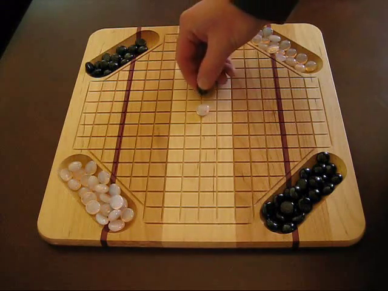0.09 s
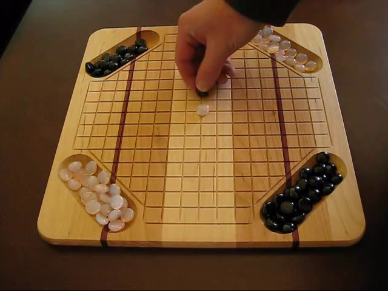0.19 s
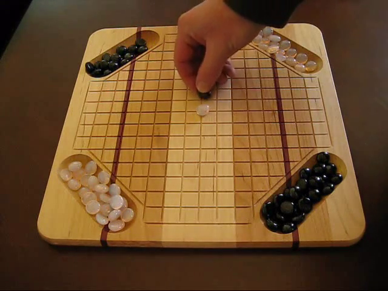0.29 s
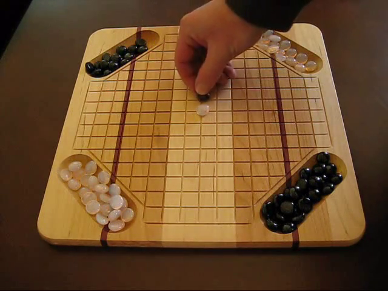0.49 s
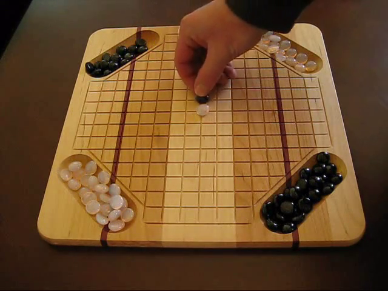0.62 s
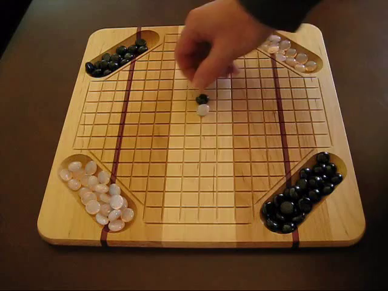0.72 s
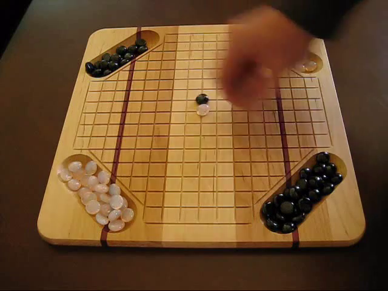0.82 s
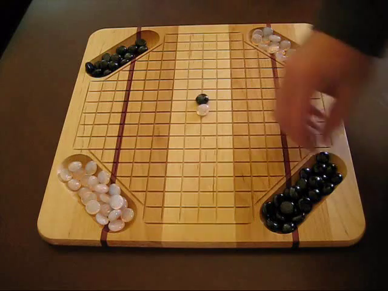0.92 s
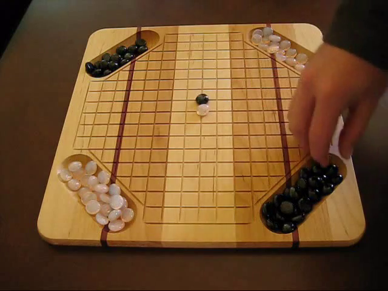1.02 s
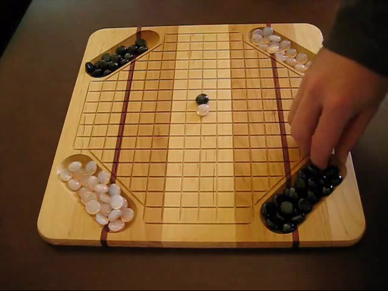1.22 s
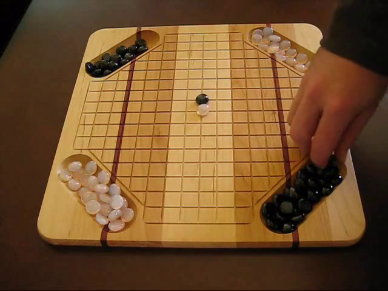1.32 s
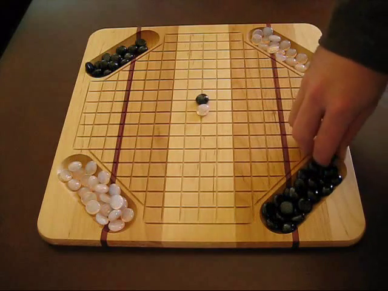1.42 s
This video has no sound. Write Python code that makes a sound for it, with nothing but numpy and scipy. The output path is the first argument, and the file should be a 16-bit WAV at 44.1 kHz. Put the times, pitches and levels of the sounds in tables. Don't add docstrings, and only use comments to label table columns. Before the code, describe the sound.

Glass gem taps and clacks down on a wooden board, then fingers rattle a tray of gems

```python
import sys
import numpy as np
from scipy import signal
from scipy.fft import rfft, irfft, next_fast_len
from scipy.io import wavfile
from scipy.ndimage import uniform_filter1d

SR = 44100
rng = np.random.default_rng(int(sys.argv[2]) if len(sys.argv) > 2 else 0)


def ratio_of_db(decibels):
    return 10 ** (np.asarray(decibels, float) / 20)


def pcm_store(signal):
    levels = np.round(np.clip(np.atleast_2d(signal), -1, 1) * 32767)
    wavfile.write(sys.argv[1], SR, levels.astype(np.int16).T)


N = 63945


def along(points, hz):
    f, value = np.transpose(points)
    return np.interp(np.log(hz + 1), np.log(f + 1), value)


def filtered(x, response):
    m = next_fast_len(N + 8192)
    return irfft(rfft(x, m) * response(np.fft.rfftfreq(m, 1 / SR)), m)[:N]


def resonance(f, hz, wide_hz):
    return 1j * f * wide_hz / (hz * hz - f * f + 1j * f * wide_hz)


# f/Hz, density level/dB per Hz
HISS = [(15, -53), (25, -14), (80, -10.5), (103, -3.5), (128, -9), (290, -9), (944, -11), (7000, -23),
        (9100, -28.5), (15400, -120)]
# f/Hz, density level/dB per Hz
HISS_TOP = [(7000, -16), (8400, -26), (10500, -25), (15300, -28)]


def hiss():
    def colour(hz):
        return ratio_of_db(along(HISS[:-1] + HISS_TOP, hz)) * (hz < 15450) * (hz > 15)

    noise = filtered(rng.standard_normal(N), colour)
    return ratio_of_db(-52) * noise / noise.std()


# f/Hz, t60/s
ROOM = [(300, 0.18), (1500, .3), (4000, 0.26), (7000, 0.16), (12000, 0.16)]


def room(x, splits):
    delay_s, even_hz = 0.0022, 150
    out, now = np.zeros(N), np.arange(N)
    for start, end in zip(splits, splits[1:]):
        hz, t, z = signal.stft(rng.standard_normal(SR // 2), SR, nperseg=128)
        decay = ratio_of_db(-60 * t / along(ROOM, hz)[:, None])
        tail = signal.istft(z * decay, SR, nperseg=128)[1]
        spectrum = rfft(tail)
        power = np.abs(spectrum) ** 2
        bins = round(even_hz * len(tail) / SR)
        even = np.sqrt(uniform_filter1d(power, 12 * bins)) / np.sqrt(uniform_filter1d(power, bins))
        tail = irfft(spectrum * even, len(tail))[:-SR // 20]
        tail = np.pad(tail / np.linalg.norm(tail), (round(delay_s * SR), 0))
        part = np.where((now >= start * SR) & (now < end * SR), x, 0)
        out += signal.fftconvolve(part, tail)[:N]
    return out


# t/s, level/dB, f/Hz, t60/s
THUDS = [
    (.399, -36.5, 554, 0.11),
    (.394, -43, 389, 0.058),
    (1.118, -41, 191.4, 0.13),
    (1.143, -47, 192, 0.17),
]


def thuds():
    s, db, hz, t60 = np.transpose(THUDS)[:, :, None]
    t = np.clip(np.arange(N) / SR - s, 0, None)
    swell = 1 - np.exp(-t / 0.0034)
    return (ratio_of_db(db - 60 * t / t60) * swell * np.sin(2 * np.pi * hz * t)).sum(0)


def struck(hits, modes_of, rise_s, crack_db=7):
    out, t = np.zeros((2, N + SR)), np.arange(SR // 6) / SR
    damped = ratio_of_db(-8 * np.clip(t / .0024 - 1, 0, .4) / .4)
    for row in hits:
        hz, db, t60 = np.transpose(modes_of(row))[:, :, None]
        sign = (-1.) ** np.arange(len(hz))[:, None]
        scattered = ratio_of_db(db + 1.5 * rng.standard_normal(db.shape))
        tones = sign * scattered * np.sin(2 * np.pi * hz * t)
        ring = (tones * ratio_of_db(-60 * t / t60)).sum(0) * damped * (1 - np.exp(-(t / rise_s) ** 2))
        brief_t60 = np.minimum(t60 / 3, .0035 * (1 + (1500 / hz) ** 2))
        blow = (tones * ratio_of_db(-60 * t / brief_t60)).sum(0) * (1 - np.exp(-t / .0001))
        crack = t == 0
        blow = blow / np.linalg.norm(blow) + ratio_of_db(crack_db) * crack
        blow = blow * np.linalg.norm(ring) / np.linalg.norm(blow)
        pair = np.array([ring, blow])
        out[:, round(row[0] * SR):][:, :len(t)] += ratio_of_db(row[1]) * pair / np.abs(ring).max()
    return out[:, :N]


def tilted(modes):
    return lambda row: [(hz, db + row[2] * np.log2(hz / 2600), t60) for hz, db, t60 in modes]


# t/s, level/dB, brightness/dB per octave
RELEASE = [
    (.7462, -40, -2),
    (.7492, -38, -3),
    (.753, -47, 1),
    (.762, -45, -6),
    (.772, -55, -16),
    (.7835, -42, -18),
]
# f/Hz, level/dB, t60/s
RELEASE_MODES = [(967, -7, .05), (1630, 0, 0.041), (2250, -1, .03), (3200, 1.5, 0.028)]


def release():
    return struck(RELEASE, tilted(RELEASE_MODES), rise_s=.0006)


# t/s, length/s, tray level/dB, glass fizz level/dB, broad scrape level/dB
SHUFFLES = [
    (1.112, 0.061, -33, -35, -23),
    (1.317, 0.12, -44, -47, -44),
    (1.399, 0.016, -35, -62, -53),
    (1.417, 0.02, -30, -71, -51),
    (1.436, 0.024, -41, -66, -57),
]
# f/Hz, level/dB
RUB = [(1700, 2), (2000, 9.5), (2200, 6.5), (3180, 3.5), (6300, -11)]


def shuffle():
    t, draw = np.arange(N) / SR, rng.random((2, N))
    grains = (draw[0] < 4000 / SR) * (draw[1] * 2 - 1)
    push = np.zeros((3, N))
    for start, length, *dbs in SHUFFLES:
        swell = np.sin(np.pi * np.clip((t - start) / length, 0, 1)) ** .5
        push += ratio_of_db(np.array(dbs)[:, None]) * swell

    def body(f):
        return sum((-1) ** k * ratio_of_db(db + 10) * resonance(f, hz, 330) for k, (hz, db) in enumerate(RUB))

    notes = filtered(push[0] * grains, body)
    fizz = filtered(push[1] * grains, lambda f: resonance(f, 11500, 9000) ** 2)
    scrape = filtered(push[2] * grains, lambda f: resonance(f, 2600, 4500))
    return notes + fizz + scrape


# t/s, level/dB, brightness/dB per octave
KNOCKS = [(1.1115, -36, 0), (1.1177, -34, 11), (1.1238, -23, 1), (1.1246, -12, 1.5), (1.1272, -35, 15),
          (1.1292, -27, 3), (1.134, -25, -3), (1.14, -28, -4), (1.1436, -21, -1), (1.1448, -16, -2),
          (1.149, -28, -17), (1.156, -35, 5), (1.159, -30, -7), (1.1616, -22.5, -4), (1.1663, -21, 0),
          (1.1707, -29, -6), (1.174, -32, -31), (1.18, -52, -2), (1.186, -43, -6), (1.1908, -32, 4),
          (1.3348, -41, -1), (1.3515, -41, 16), (1.3609, -35.5, 4), (1.3897, -34, 8), (1.4035, -44, -6),
          (1.4062, -34.5, -3), (1.4138, -31.5, -2), (1.4225, -39, 3), (1.4255, -34, -3), (1.429, -37, 2),
          (1.4335, -31.5, -1)]
# f/Hz, level/dB, t60/s
TRAY_MODES = [(1160, -12, 0.018), (1560, -4, 0.0088), (1987, 2, 0.014), (2210, -0.5, 0.031),
              (2740, -3.5, 0.013), (3204, 4, 0.024), (3870, -9.5, 0.015), (4366, -3.5, 0.015),
              (5500, -10, 0.011)]


def knocks():
    return struck(KNOCKS, tilted(TRAY_MODES), rise_s=.0006)


# t/s, peak level/dB, main ring f/Hz, upper ring level/dB, lower ring level/dB
PLUNGE = [(1.1121, -39, 8800, -3, 12), (1.1173, -25, 9100, -16, -12), (1.1237, -24, 10300, -3, -4),
          (1.1246, -12, 10100, -3, -6), (1.1258, -19, 10100, -1, -3), (1.1272, -25, 11000, -3, -2),
          (1.1281, -22, 10800, -3, 1), (1.1293, -25, 9600, -1, -3), (1.1303, -23, 9100, 1, -4),
          (1.1344, -25, 10400, -7, -3), (1.1391, -28, 9400, -9, -4), (1.1427, -34, 8900, -7, -3),
          (1.1537, -30, 9400, -3, -4), (1.1581, -29, 9600, -3, -9), (1.1616, -16, 9400, -5, -5),
          (1.1656, -23, 10300, -3, 1), (1.1684, -34, 10300, -1, 3), (1.1703, -26, 9600, -4, -8),
          (1.1756, -37, 9400, -7, -4), (1.191, -36, 12700, -6, 14)]
# t/s, peak level/dB, main ring f/Hz, upper ring level/dB, lower ring level/dB
PINCH = [
    (1.3251, -41, 10000, -10, -1),
    (1.3351, -36, 9700, -2, -2),
    (1.352, -38, 9500, -4, 2),
    (1.3617, -33, 9400, -5, -1),
    (1.3801, -32, 9300, 5, 3),
    (1.3899, -41, 11100, -2, 4),
    (1.4141, -43, 9600, -6, -4),
]


def clink_modes(row):
    main, t60 = row[2], .0055
    modes = [(main, 0, t60), (main * 1.09, -5, t60)]
    modes += [(main * ratio, row[3] - 2, t60) for ratio in (1.3, 1.47)]
    modes += [(main * ratio, row[4] - 2, t60) for ratio in (.52, .66)]
    return modes


def clinks():
    rings = struck(PLUNGE + PINCH, clink_modes, rise_s=.0001)
    snaps, t = np.zeros(N + SR), np.arange(SR // 100) / SR
    for row in PLUNGE + PINCH:
        level_db = row[1] + min(row[3], -row[4]) - 6
        burst = ratio_of_db(level_db - 60 * t / .005) * rng.standard_normal(len(t))
        snaps[round(row[0] * SR):][:len(t)] += burst
    snap = filtered(snaps[:N], lambda f: resonance(f, 11500, 9000) ** 2)
    return ratio_of_db(-.5) * (rings + snap)


# t/s, peak level/dB
TOUCH = [
    (0.2379, -7),
]
# f/Hz, level/dB, t60/s
TOUCH_MODES = [(787, -16.5, 0.07), (1086, -13.5, 0.07), (1715, 0, 0.072), (1785, -13.5, 0.33),
               (2700, -2, 0.019), (2754, -27, 0.34), (3355, 4.5, 0.02), (3750, -8.5, 0.025),
               (4410, -11.5, 0.03), (4820, -5, 0.014), (5200, -4, 0.013), (7200, -31, 0.031),
               (9200, -28.5, 0.056), (10300, -29.5, 0.018)]
# f/Hz, level/dB
TOUCH_SEND = [(350, -18), (800, -9), (1400, -9.5), (2200, -4), (3600, -9), (4400, -11), (5300, -10),
              (6500, -23), (16000, -52)]
# f/Hz, width/Hz, level/dB
TOUCH_NOTES = [(1070, 260, 7), (1775, 70, 11), (2760, 220, 8), (3400, 300, 3)]
# t/s, level/dB
SETDOWN = [
    (.3918, -20),
    (.3935, -3),
    (.4007, -10),
    (.4095, -24),
]
# f/Hz, level/dB, t60/s
SETDOWN_MODES = [(372, -35, 0.099), (545.6, -19.5, 0.17), (860, -21, 0.031), (1154, -9.5, 0.046),
                 (1760, 0.5, 0.065), (2460, -1, 0.022), (3032, -3.5, 0.058), (3437, 12, 0.015),
                 (3778, 11, 0.0097), (5010, 8.5, 0.017), (5750, 2, 0.022), (6130, -0.5, 0.007),
                 (9060, -15, 0.12), (10650, -4, 0.0041), (12550, -12.5, .012)]
# f/Hz, level/dB
SETDOWN_SEND = [(350, -15.5), (800, -12), (1500, -8), (2300, -5), (3000, -6.5), (3900, -9), (4700, -9.5),
                (5500, -7), (6500, -13), (7400, -20.5), (16000, -45)]
# f/Hz, width/Hz, level/dB
SETDOWN_NOTES = [(552, 70, 7), (1285, 150, 5), (1774, 50, 9), (2330, 300, 1), (3750, 800, 2),
                 (5450, 700, 3)]


def board_contact(hits, modes, send, notes):
    ring, blow = struck(hits, lambda row: modes, rise_s=.0002, crack_db=30)

    def colour(f):
        lingering = sum(ratio_of_db(db) * resonance(f, hz, wide_hz) for hz, wide_hz, db in notes)
        return ratio_of_db(along(send, f)) * (1 + lingering)

    return ring, ratio_of_db(-1) * filtered(room(blow, [0, 2]), colour)


def board():
    touch, touch_wash = board_contact(TOUCH, TOUCH_MODES, TOUCH_SEND, TOUCH_NOTES)
    setdown, setdown_wash = board_contact(SETDOWN, SETDOWN_MODES, SETDOWN_SEND, SETDOWN_NOTES)
    return touch + setdown, touch_wash + setdown_wash


# f/Hz, level/dB
TRAY_SEND = [(300, -5.5), (900, -1.5), (2500, 4), (5000, -8.5), (8000, 0.5), (16000, -26)]


def scene():
    wood, wood_wash = board()
    tray, tray_blows = release() + knocks() + clinks() + shuffle()
    tails = room(tray_blows, [0, 1, 1.14, 1.29, 2])
    tray_wash = ratio_of_db(-6) * filtered(tails, lambda hz: ratio_of_db(along(TRAY_SEND, hz)))
    near = filtered(wood + tray, lambda f: (1j * f / (300 + 1j * f)) ** 2)
    return (near + wood_wash + tray_wash + thuds() + hiss())[None]


def band_limit(x):
    return signal.sosfilt(signal.butter(12, 16800, fs=SR, output="sos"), x)


def record(dry):
    def response(hz):
        offset = hz - 7875
        wide_db = -8.5 * np.exp(-(offset / 480) ** 2)
        core_db = -66 * np.exp(-(offset / 165) ** 4)
        roll_db = -25 * np.clip((hz - 15450) / 400, 0, 1)
        return ratio_of_db(wide_db + core_db + roll_db) * (hz < 16800)

    mix = filtered(dry[0], response)[None]
    return band_limit(mix)


dry = scene()
out = record(dry)
pcm_store(out)
```